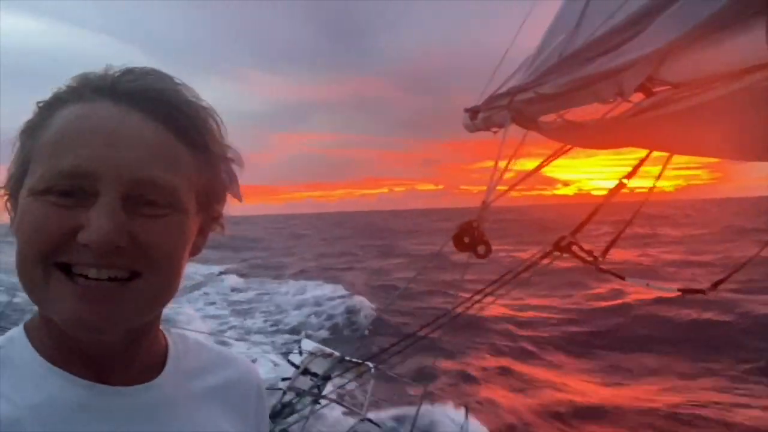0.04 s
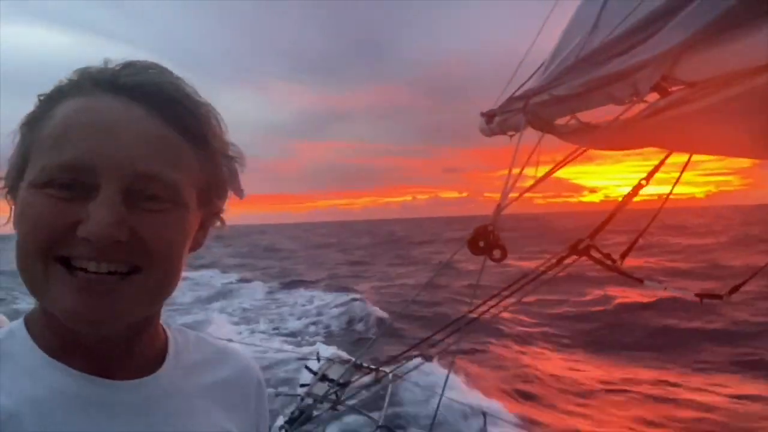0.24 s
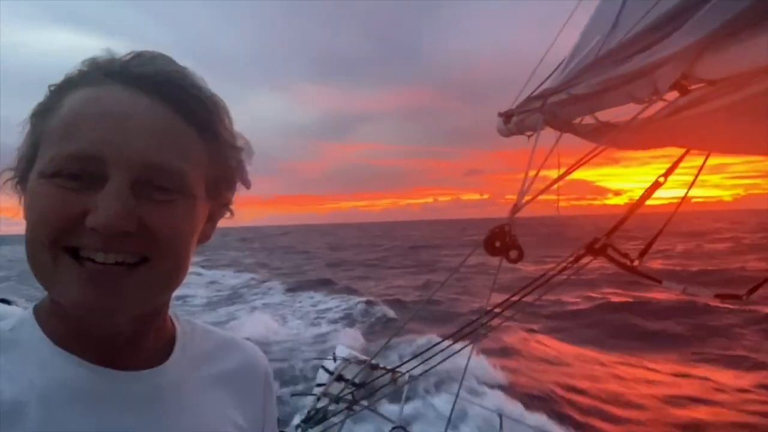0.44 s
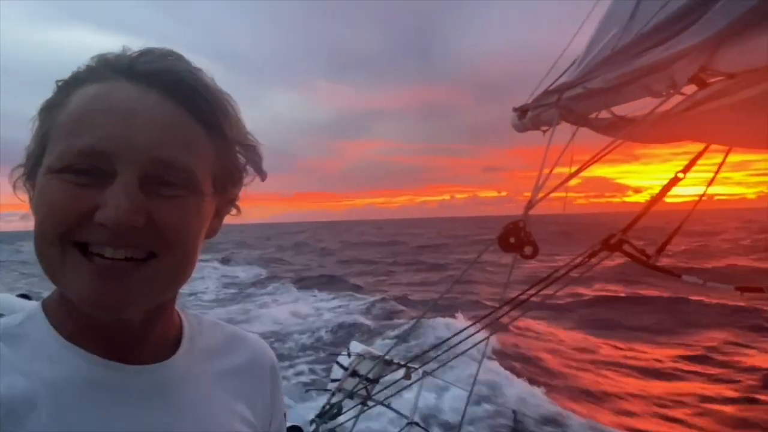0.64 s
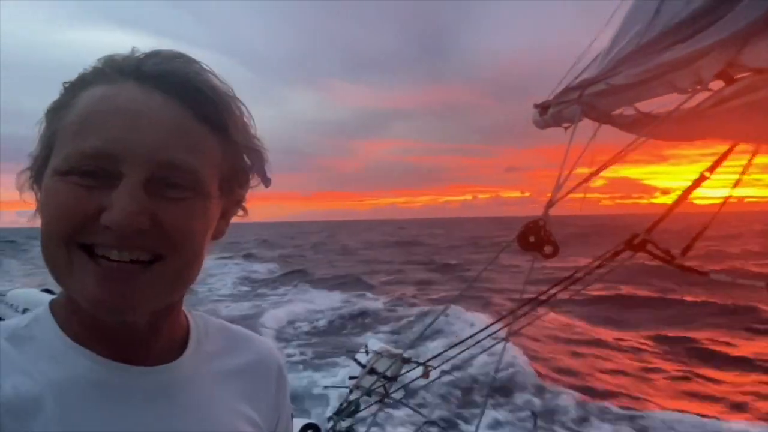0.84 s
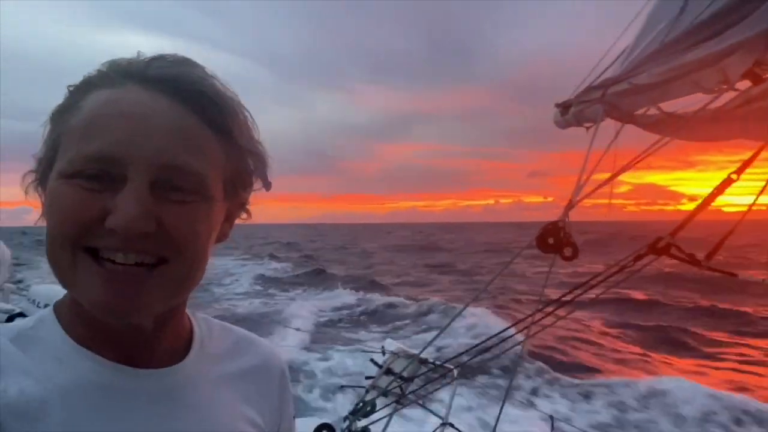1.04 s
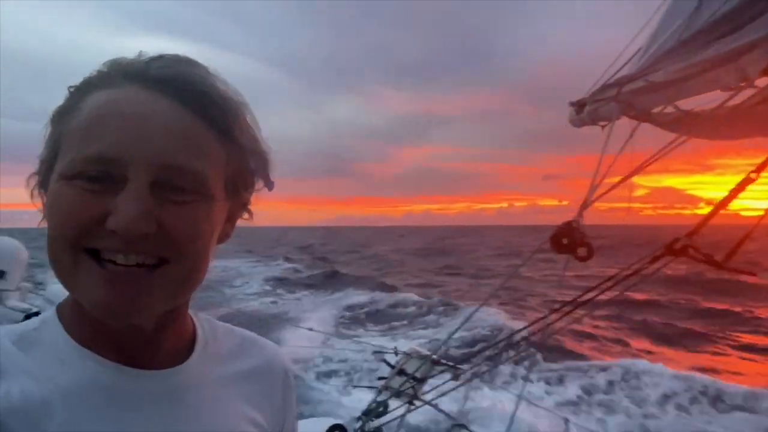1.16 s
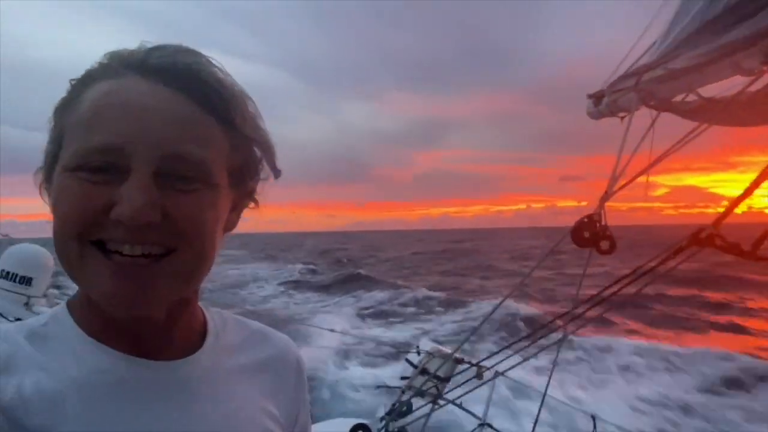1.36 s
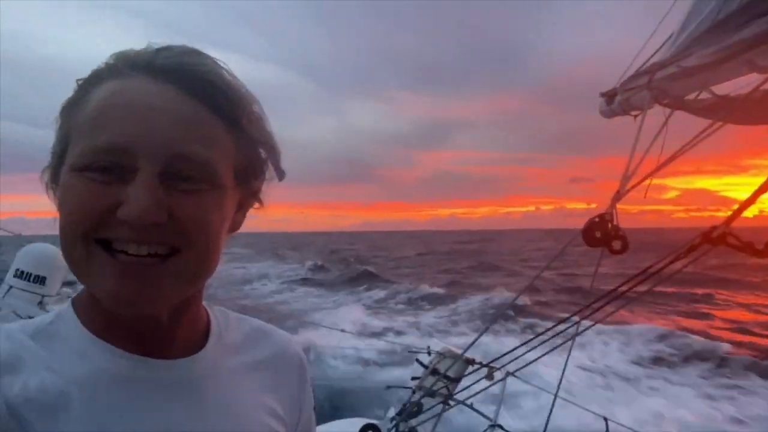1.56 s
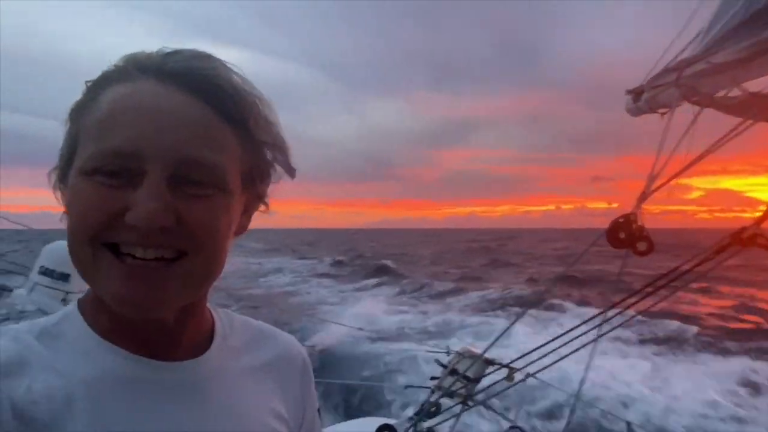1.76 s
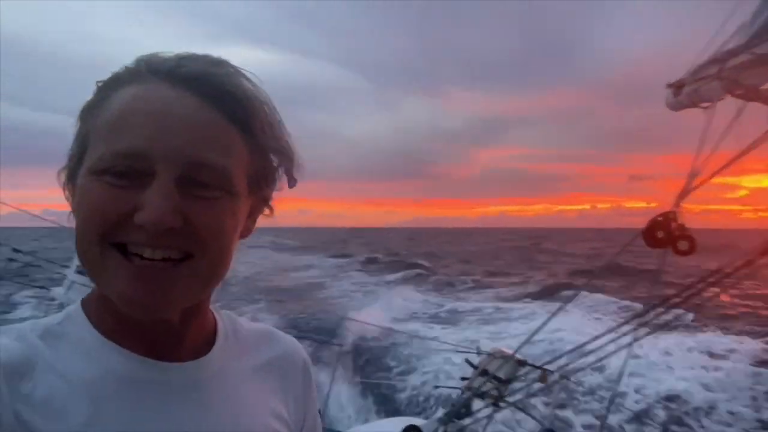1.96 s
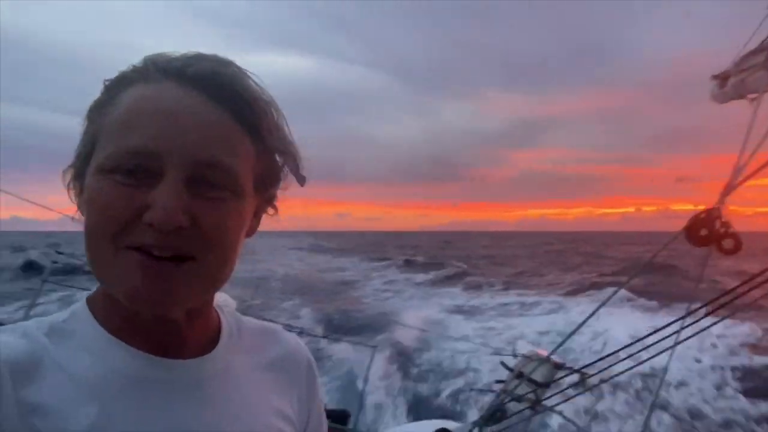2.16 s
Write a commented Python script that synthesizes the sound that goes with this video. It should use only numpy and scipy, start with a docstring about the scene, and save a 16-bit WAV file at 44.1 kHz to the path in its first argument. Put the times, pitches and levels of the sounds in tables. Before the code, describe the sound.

Wind thumps and flutters on a small microphone aboard a fast sailboat, its wake hissing behind.

```python
"""Wind thumps and flutters in gusts on a small handheld microphone pair, aboard a sailing boat running fast.
The wind is a shower of short sliding swirls, with single strong eddies placed one by one.
The wake hisses and fizzes, more and more from the left: filtered noise and drops in drifting patches.
A low tone, probably a foil or a taut line singing, hums underneath: a wavering sine with a weak octave.
The stereo of the top bands is as lossy stereo coding leaves it."""
import sys
import numpy as np
from scipy import signal
from scipy.fft import rfft, irfft
from scipy.io import wavfile
from scipy.ndimage import uniform_filter1d

SR = 44100
rng = np.random.default_rng(int(sys.argv[2]) if len(sys.argv) > 2 else 0)


def to_wav(s):
    """Save 16-bit WAV."""
    ch = np.atleast_2d(s).T  # columns
    pcm = np.round(np.clip(ch, -1, 1) * 32767)  # PCM
    wavfile.write(sys.argv[1], SR, pcm.astype(np.int16))


N = 96667


def amp(db):
    """Decibel law: 20 dB is a factor of ten in amplitude."""
    return 10 ** (np.asarray(db) / 20)


def evened(x):
    """Normalization: scales a signal to an rms of 1."""
    return x / np.sqrt(np.mean(x ** 2) + 1e-20)


def read(points, hz):
    """Spectral interpolation: reads a spectrum table on a log-frequency axis."""
    f, value = np.transpose(points)
    return np.interp(np.log(hz + 1), np.log(f + 1), value)


def curve(table, column, t=None):
    """Linear interpolation: joins one column of a time table by straight lines."""
    rows = np.array(table, float)
    times = np.arange(N) / SR if t is None else t
    return np.interp(times, rows[:, 0], rows[:, column])


def drift(t, low_hz, high_hz):
    """Random-phase superposition: many slow sines add up to a chance fluctuation of rms 1."""
    total = 0
    for f in np.geomspace(low_hz, high_hz, 30):
        total = total + np.sin(2 * np.pi * (f * t + rng.random())) / np.sqrt(f)
    return evened(total)


def colour(x, spectrum):
    """Linear filtering: multiplies the spectrum of a sound by a table, then sets its rms to 1."""
    gain = amp(read(spectrum, np.fft.rfftfreq(N, 1 / SR)))
    return evened(irfft(rfft(x) * gain, N))


def swirl(hz, cycles, fall, phase):
    """Gaussian wave packet with a chirp: a few cycles under a bell, sliding in pitch."""
    u = np.arange(-3 * cycles, 3 * cycles, hz / SR)  # time in cycles
    bell = np.exp(-.5 * (u / cycles) ** 2)
    return bell * np.cos(2 * np.pi * (u - fall * u ** 2 / 2 + phase))


def grains(per_s, spread_db, low_hz, high_hz, cycles, fall, count=24):
    """Shot noise: random swirls of many pitches, rarer when lower; per_s is the rate at the top pitch."""
    out = np.zeros(N)
    for hz in np.geomspace(low_hz, high_hz, count):
        when = rng.random(N) < per_s * hz / high_hz / SR
        size = amp(spread_db * np.minimum(rng.exponential(1, N), 4))
        shape = swirl(hz, cycles, fall, rng.random())
        out += signal.oaconvolve(when * size, shape / np.linalg.norm(shape), "same")
    return evened(out)


EDDY_CYCLES, EDDY_FALL = 0.64, 0.15  # width of the bell in cycles; share of pitch lost per cycle
# The strongest eddies on the microphone.
# Each row: centre in seconds, pitch in Hz, peak level of the bell in dB.
STRONG_EDDIES = [(0.021, 462, -8.5), (0.298, 330, -0.5), (0.307, 106, -7), (0.324, 47, -13),
                 (0.35, 205, -5.5), (0.36, 385, -10), (0.373, 356, -11), (0.38, 204, -6), (0.403, 189, -16),
                 (0.453, 297, -16), (0.462, 330, -11), (0.468, 530, -11), (0.471, 387, -6.5),
                 (0.49, 112, -10), (0.478, 156, -4), (0.501, 104, -4), (0.559, 207, -10),
                 (0.57, 239.2, -10), (0.579, 278, -7), (0.588, 129, -8), (0.591, 49.3, -11.5),
                 (0.612, 190.4, -8.5), (0.654, 107, -5.5), (0.72, 103, -13.5), (0.725, 760.5, -16),
                 (0.881, 100.8, -10), (0.958, 207, -7.5), (1.025, 111, -9.5), (1.025, 500.4, -10),
                 (1.044, 225, -15), (1.063, 323.4, -9.5), (1.066, 640, -11), (1.079, 205, -6.5),
                 (1.083, 407.8, -6), (1.09, 60, -9), (1.129, 260, -3), (1.13, 78.76, -8),
                 (1.139, 428, -8.5), (1.186, 356.8, -8.5), (1.197, 196, -15), (1.199, 112.6, -7),
                 (1.239, 483, -9), (1.25, 151, -16.5), (1.287, 507, -2), (1.288, 990, -13),
                 (1.352, 465.5, -4.5), (1.362, 110.5, -8.5), (1.446, 250, -15), (1.461, 430, -11.5),
                 (1.462, 766, -10.5), (1.555, 960, -9), (1.56, 127, -12), (1.575, 64.4, -6.5),
                 (1.641, 212, -11), (1.653, 477, -6.5), (1.659, 71.8, -11), (1.673, 846, -9.5),
                 (1.674, 560, -5.5), (1.688, 435, -6.5), (1.698, 91.5, -4.5), (1.83, 703, -13),
                 (1.839, 486, -8.5), (1.843, 112, -5.5), (1.863, 485, -11), (1.875, 744, -13),
                 (1.908, 640, -11), (1.908, 134, -16), (1.92, 840, -14), (1.927, 47.8, -11),
                 (1.926, 206, -7), (1.937, 940, -16.0), (1.946, 332, -7.5), (1.973, 756, -18),
                 (1.989, 760, -9), (2.102, 1070, -12.5), (2.11, 620, -8), (2.119, 832, -10),
                 (2.146, 915, -13), (2.151, 484, -11), (2.16, 416, -7.5), (2.166, 189, -12)]


def strong_eddies():
    """Turbulent pressure pulses: each strong eddy is one short packet of falling pitch."""
    out = np.zeros(N + SR)
    for s, hz, db in STRONG_EDDIES:
        eddy = amp(db) * swirl(hz, EDDY_CYCLES, EDDY_FALL, rng.random())
        start = round(s * SR) - len(eddy) // 2
        out[start:start + len(eddy)] += eddy
    return out[:N]


def eddy_tails():
    """Exponential decay: strong eddies, chiefly high ones, leave a dying envelope for ragged rattle."""
    tail_db, tail_s, tail_from_hz = -25, 0.0055, 540
    kicks = np.zeros(N)
    for s, hz, db in STRONG_EDDIES:
        kicks[round(s * SR)] += amp(db + tail_db) / (1 + (tail_from_hz / hz) ** 4)
    tails = signal.lfilter([1], [1, -np.exp(-1 / (tail_s * SR))], kicks)
    return uniform_filter1d(tails, size=100)


def small_eddies():
    """Turbulence as shot noise: a shower of small swirls mixed with smooth filtered noise."""
    share = 0.55  # of the shower in the mixture
    lumps = grains(500, 4.5, 35, 1500, EDDY_CYCLES, EDDY_FALL)
    smooth = colour(rng.standard_normal(N), [(20, -12.5), (1500, -6.5), (3000, -40)])
    return share * lumps + (1 - share) * smooth


# Strength of the gusts, before the quick puffs.
# Each row: time in seconds, level of the low rumble in dB, of the flutter in dB, of the higher rattle in dB.
GUST_LEVELS = [(0, -19, -38, -24.5), (.07, -19, -27.5, -30), (.19, -23.5, -29.5, -34),
               (.26, -19.5, -19, -32), (.31, -24, -18, -30), (.37, -18, -28, -29), (.43, -28, -34, -33),
               (.475, -21, -16, -30.5), (.53, -21, -25, -32), (.585, -19.5, -18, -29.5),
               (.67, -20, -28, -32.5), (.72, -21, -27, -36), (.79, -25.5, -29.5, -37.5),
               (.87, -19.5, -25.5, -29), (.95, -21, -21.5, -29.5), (1.05, -17.5, -20, -29),
               (1.13, -23, -22, -26), (1.165, -22, -23, -25.5), (1.2, -16.5, -22, -25),
               (1.26, -18.5, -28, -26), (1.32, -18.5, -29, -30), (1.37, -19, -26.5, -29.5),
               (1.45, -18, -29, -27), (1.5, -16, -17, -28.5), (1.57, -14, -23, -26),
               (1.61, -20, -22.5, -24.5), (1.68, -24, -20, -22.5), (1.73, -16.5, -23.5, -27.5),
               (1.79, -26, -30.5, -29.5), (1.84, -21, -25, -23.5), (1.92, -22, -20, -22),
               (1.99, -29, -21, -25.5), (2.04, -23, -26, -26.5), (2.08, -19, -31, -30),
               (2.115, -18, -28, -19.5), (2.135, -25, -23, -25), (2.16, -19, -18.5, -20.5),
               (2.19, -19, -24, -36)]
# Spectra of the three wind layers. Each row: frequency in Hz, relative spectral gain in dB.
RUMBLE_SPECTRUM = [(15, -40), (30, -27), (55, 5.5), (90, -1), (140, -7), (250, -17.5), (450, -44),
                   (900, -52), (3000, -90)]
FLUTTER_SPECTRUM = [(60, -8), (150, 3.5), (300, 0), (450, -9), (800, -27.5), (1500, -33), (4000, -62)]
RATTLE_SPECTRUM = [(150, -26), (350, -5), (550, 0.5), (850, -4), (1200, -11), (2200, -18), (5000, -60)]


def wind():
    """Amplitude modulation of turbulence: gusts and puffs swell three bands, alike in both channels."""
    air = small_eddies()
    puffs = drift(np.arange(N) / SR, 8, 50)
    rumble_gain = amp(curve(GUST_LEVELS, column=1) + 0.36 * puffs)
    flutter_gain = amp(curve(GUST_LEVELS, column=2) + 0.99 * puffs)
    rattle_gain = amp(curve(GUST_LEVELS, column=3) + 1.6 * puffs) + eddy_tails()
    rumble = colour(air, RUMBLE_SPECTRUM) * rumble_gain
    flutter = colour(air, FLUTTER_SPECTRUM) * flutter_gain
    rattle = colour(air, RATTLE_SPECTRUM) * rattle_gain
    return rumble + flutter + rattle + strong_eddies()


# The bass is nearly the same in both channels, below a rising frequency.
# Each row: time in seconds, that frequency in Hz, level of the differing bass relative to the rumble in dB.
MONO_BASS = [(0, 447, -21.5), (.9, 480, -19.5), (1.2, 800, -45), (1.45, 950, -50), (2.19, 950, -54)]


def wide_share(hz, t):
    """Crossover: share of stereo width, near 0 below the mono frequency and near 1 above it."""
    return 1 / (1 + (curve(MONO_BASS, column=1, t=t) / (hz + 1)) ** 10.8)


def wind_apart(air):
    """Quadrature phase shift: the upper wind, turned a quarter cycle, spreads between the channels."""
    hz, t, z = signal.stft(air, SR, nperseg=1024)
    turned = 1j * z * wide_share(hz[:, None], t)
    return amp(-8.5) * signal.istft(turned, SR, nperseg=1024)[1][:N]


# Spectrum of the differing rumble. Each row: frequency in Hz, relative spectral gain in dB.
APART_SPECTRUM = [(20, -10), (60, 4), (250, 2), (450, -2), (700, -17), (2000, -70)]


def rumble_apart():
    """Decorrelated noise: a faint rumble that follows the gusts and differs between the channels."""
    level_db = curve(GUST_LEVELS, column=1) + curve(MONO_BASS, column=2)
    return colour(rng.standard_normal(N), APART_SPECTRUM) * amp(level_db)


FRAME, HOP = 512, 128  # samples of the short-time spectra of the water


def drop_spectrum(frames):
    """Shot noise of bursting drops: short packets of slightly rising pitch, as a short-time spectrum."""
    drops = np.pad(grains(2500, 8, 700, 8000, 1.8, -0.0059), (0, 1024))
    z = signal.stft(drops, nperseg=FRAME, noverlap=FRAME - HOP)[2][:, :frames]
    return z / np.sqrt(np.mean(abs(z[20:80]) ** 2) / 2)


def water_noise(frames):
    """Superposition: complex random noise makes the hiss, and drops are added to it."""
    drops_db = -12.5  # relative to the real or imaginary part of the noise
    real, imaginary = rng.standard_normal((2, FRAME // 2 + 1, frames))
    return real + 1j * imaginary + amp(drops_db) * drop_spectrum(frames)


# Likeness of the channels: of the water up to 8.5 kHz, above that as lossy stereo coding leaves it.
# Each row: frequency in Hz, likeness from 0 to 1.
LIKENESS = [(1000, .5), (1600, .42), (2500, .3), (4000, .27), (7000, .33), (8500, .33), (9300, .8),
            (10300, .3), (10900, .55), (11150, 1), (12950, 1), (13200, .4), (13500, .4), (13750, 1)]
# Channel phase of the top bands, as lossy stereo coding leaves it: opposite or together.
# Each row: frequency in Hz, phase of left against right in radians.
CODED_PHASE = [(8200, -2), (8800, -np.pi), (9800, -np.pi), (11200, -2 * np.pi), (12900, -2 * np.pi),
               (13600, -3 * np.pi)]


def stereo_water(hz, t):
    """Interchannel coherence: the left mixes a phase-shifted copy of the right with independent noise."""
    lag_s, lag_from_hz = 0.000492, 510  # the left lags above the bass, up to the coded top bands
    one, two = water_noise(len(t)), water_noise(len(t))
    wide = wide_share(hz, t)
    alike = 1 - wide * (1 - read(LIKENESS, hz))
    lag = -2 * np.pi * lag_s * hz ** 3 / (hz ** 2 + lag_from_hz ** 2)
    phase = np.where(hz < CODED_PHASE[0][0], lag * wide, read(CODED_PHASE, hz))
    left = alike * np.exp(1j * phase) * one + np.sqrt(1 - alike ** 2) * two
    return left, one


def smooth_patches(frames, over_frames, over_bins):
    """Moving average: random values smoothed over time and frequency into patches of rms 1."""
    noise = rng.standard_normal((FRAME // 2 + 1, frames))
    in_time = uniform_filter1d(noise, size=over_frames, axis=1)
    return evened(uniform_filter1d(in_time, size=over_bins, axis=0))


# Strength of the wake, before its spectrum and fluctuations.
# Each row: time in seconds, level of the rush in dB, level of the fizz in dB, full lean to the left in dB.
WAKE_LEVELS = [(0, -29, -40, 3), (.1, -33, -38, 2.5), (.25, -31.5, -36, 3.5), (.4, -31, -37.5, 4),
               (.52, -33, -39.5, 4.5), (.64, -27, -38, 4.5), (.72, -27.5, -38, 7), (.78, -29, -39.5, 6),
               (.9, -33, -39, 5), (1.05, -31, -39, 7), (1.2, -32.5, -37, 6.5), (1.35, -30, -40, 8),
               (1.52, -35, -38, 7), (1.6, -34.5, -38.5, 9), (1.68, -33, -34.5, 8), (1.78, -33, -34.5, 9.5),
               (1.86, -35, -36.5, 9), (1.91, -28, -32, 11.5), (1.97, -31.5, -32.5, 8.5),
               (2.05, -34, -37.5, 8.5), (2.12, -33.5, -37.5, 9), (2.19, -37, -37, 8)]
# Spectrum of the water. Each row: frequency in Hz, gain in dB added to the wake levels.
WATER_SPECTRUM = [(60, 2.5), (300, -6), (700, -8.5), (1200, -6.5), (2000, -11.5), (3000, -12.5),
                  (4500, -15), (6500, -16.5), (8000, -18.5), (9300, -23.5), (11000, -25.5), (14900, -29),
                  (15400, -33)]
# Where the lean is heard. Each row: frequency in Hz, share of the full lean.
LEAN_SHARE = [(500, 0.0055), (1500, 0.084), (3000, 0.5), (6000, 0.88), (8000, 0.94), (9500, 0.17),
              (11000, 0)]


def wake():
    """Time-varying filtering of noise: rush and fizz drift in patches, louder on the left."""
    frames, hz = N // HOP + 5, np.fft.rfftfreq(FRAME, 1 / SR)[:, None]
    t = np.arange(frames) * HOP / SR
    left, right = stereo_water(hz, t)
    half_lean_db = read(LEAN_SHARE, hz) * curve(WAKE_LEVELS, column=3, t=t) / 2
    z = np.array([left * amp(half_lean_db), right * amp(-half_lean_db)])

    rush_db, fizz_db = curve(WAKE_LEVELS, column=1, t=t), curve(WAKE_LEVELS, column=2, t=t)
    fizz_from_hz, fizz_to_hz = 2770, 9800
    fizz = 1 / (1 + (fizz_from_hz / (hz + 1)) ** 4)
    below_top = 1 / (1 + (hz / fizz_to_hz) ** 8)
    # the very top keeps the steady median level of the fizz
    upper_db = below_top * fizz_db + (1 - below_top) * np.median(fizz_db)
    level_db = (1 - fizz) * rush_db + fizz * upper_db

    patches_db = 1.0 * smooth_patches(frames, over_frames=6, over_bins=12)
    flicker_db = 1.14 * smooth_patches(frames, over_frames=90, over_bins=5)
    swell_db = 0.44 * drift(t, 1.847, 26)
    z *= amp(read(WATER_SPECTRUM, hz) + level_db + patches_db + flicker_db + swell_db)
    return signal.istft(z, nperseg=FRAME, noverlap=FRAME - HOP)[1][:, :N]


# The singing tone, before its random waver. Each row: time in seconds, pitch in Hz, level in dB.
HUM_TRACK = [(0, 265.7, -27), (.12, 263.9, -25.5), (.25, 264.5, -36), (.36, 262.6, -37), (.47, 266.3, -26),
             (.62, 265.8, -30.5), (.72, 264.7, -25.5), (.9, 265, -24.5), (1.05, 263.6, -19),
             (1.15, 265.1, -22), (1.25, 265.1, -35), (1.42, 265.2, -28.5), (1.55, 262.5, -27),
             (1.75, 260.8, -38.5), (2.19, 264.6, -43)]


def hum():
    """Frequency and amplitude modulation: a wavering tone with a breathy edge and a weak octave."""
    t = np.arange(N) / SR
    pitch_hz = curve(HUM_TRACK, column=1) + 1.0 * drift(t, 2.06, 11.65)
    turn = 2 * np.pi * np.cumsum(pitch_hz) / SR
    # random slow factors on sine and cosine blur the spectral line
    fuzz = drift(t, 1.81, 16) * np.sin(turn) + drift(t, 2.035, 16) * np.cos(turn)
    tone = np.sin(turn) + amp(-7.5) * fuzz + amp(-13.0) * np.sin(2 * turn)
    waver_db = 3 * drift(t, 3.15, 28.7)
    return np.sqrt(2) * tone * amp(curve(HUM_TRACK, column=2) + waver_db)


def scene():
    """Mid-side superposition: wind and hum in the middle, the wake in stereo, side parts in opposite sign."""
    air = wind()
    side = rumble_apart() + wind_apart(air)
    return air + hum() + wake() + side * np.array([[1], [-1]])


def record(dry):
    """Saturation and band limiting: the loudest thumps bend into a soft ceiling, then a low-pass follows."""
    knee, edge_hz = .78, 15300  # knee as a share of full scale
    over = np.maximum(abs(dry) - knee, 0)
    size = np.minimum(abs(dry), knee) + (1 - knee) * np.tanh(over / (1 - knee))
    bent = np.sign(dry) * size
    low_pass = signal.firwin(511, edge_hz, window=("kaiser", 9), fs=SR)
    return signal.oaconvolve(bent, low_pass[None], "same")


dry = scene()
out = record(dry)
to_wav(out)
```